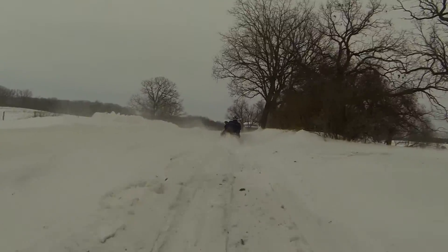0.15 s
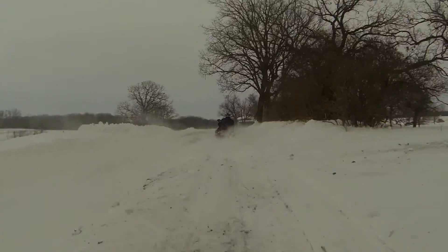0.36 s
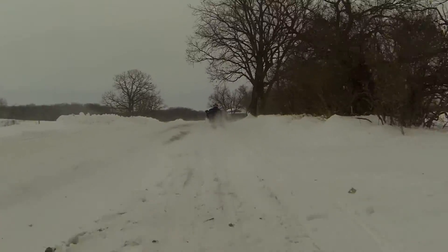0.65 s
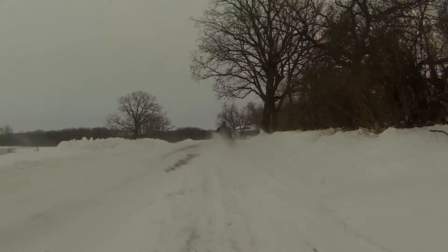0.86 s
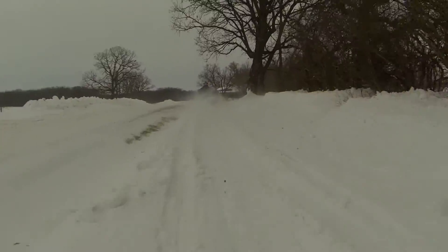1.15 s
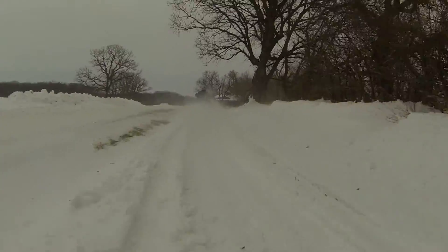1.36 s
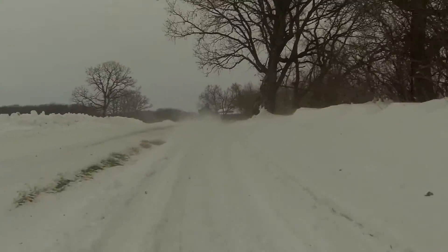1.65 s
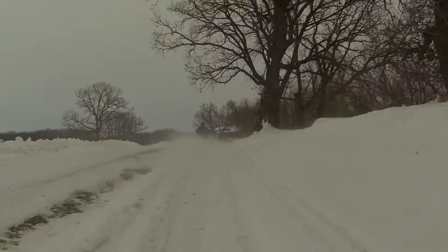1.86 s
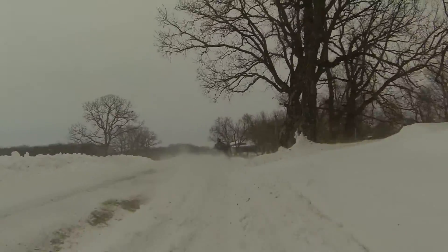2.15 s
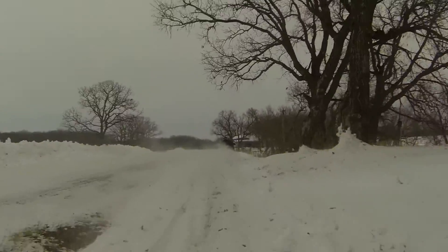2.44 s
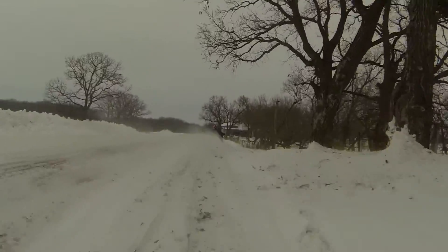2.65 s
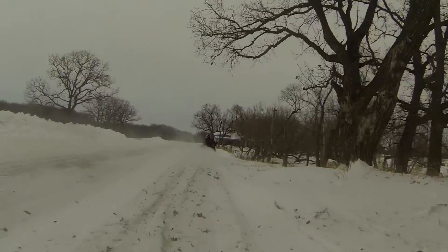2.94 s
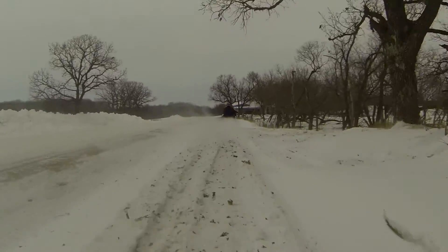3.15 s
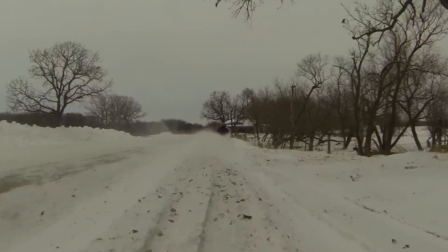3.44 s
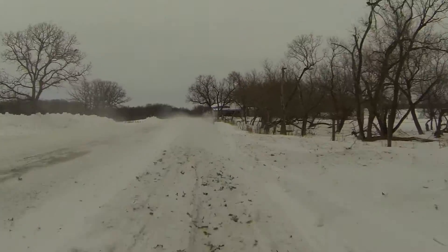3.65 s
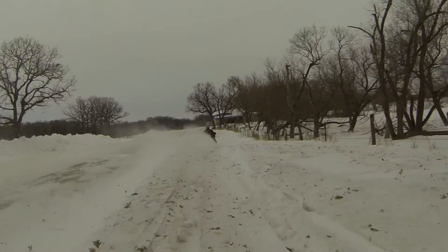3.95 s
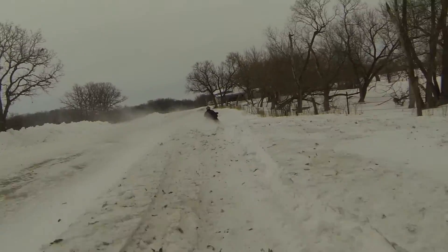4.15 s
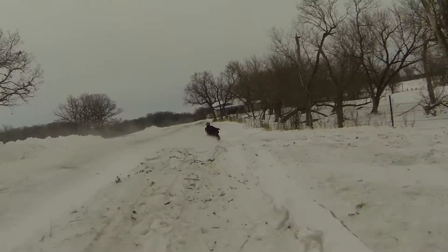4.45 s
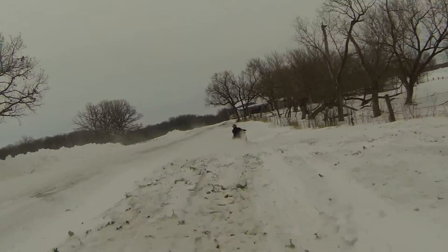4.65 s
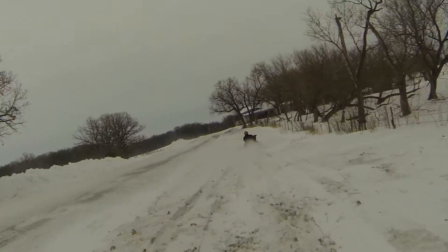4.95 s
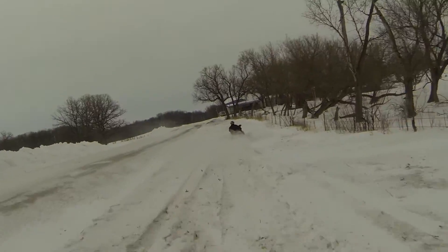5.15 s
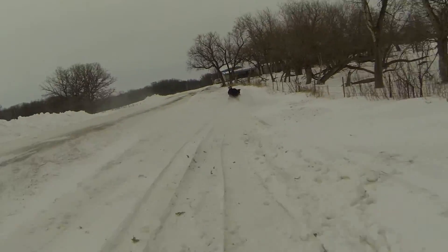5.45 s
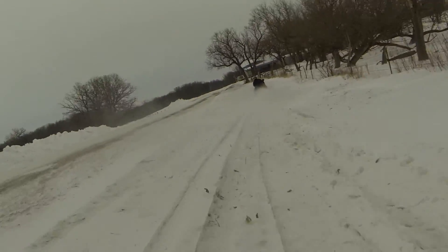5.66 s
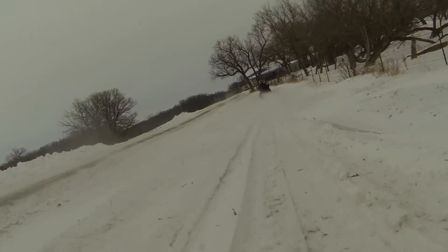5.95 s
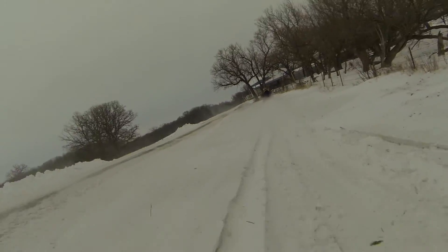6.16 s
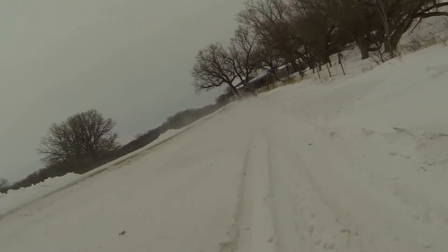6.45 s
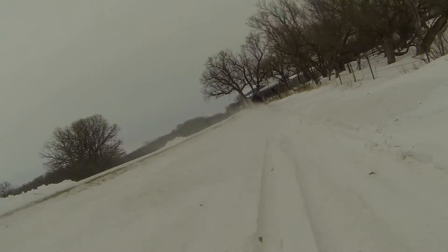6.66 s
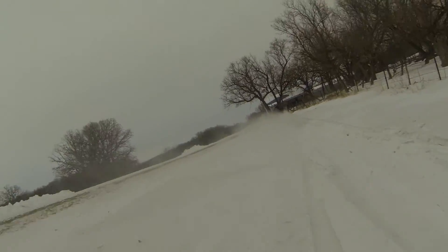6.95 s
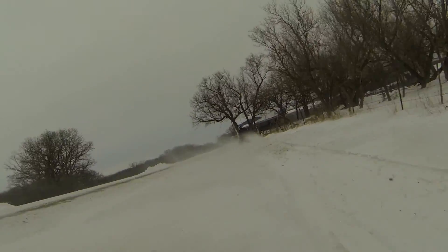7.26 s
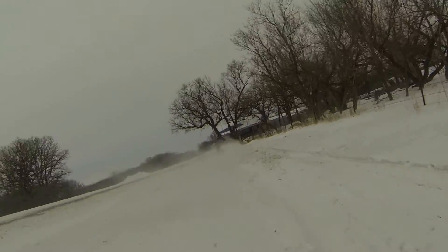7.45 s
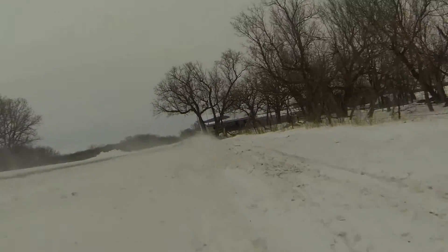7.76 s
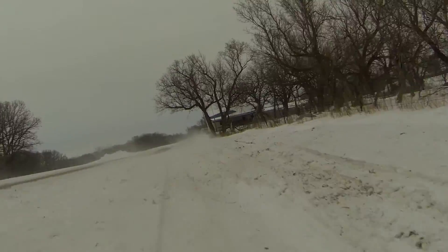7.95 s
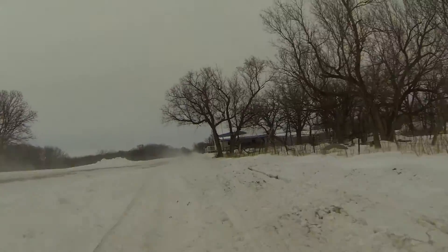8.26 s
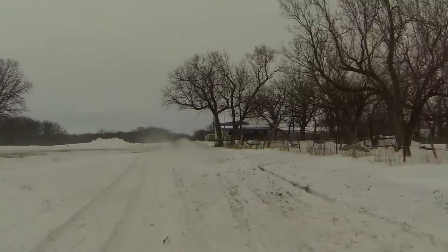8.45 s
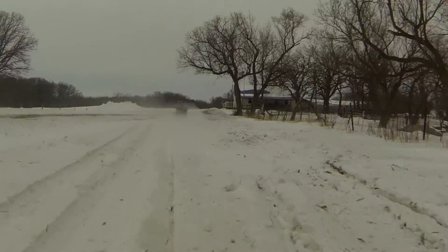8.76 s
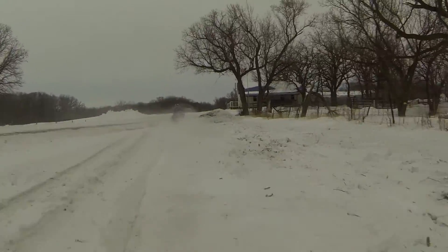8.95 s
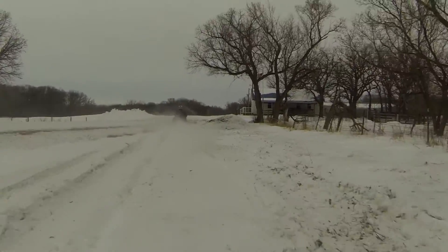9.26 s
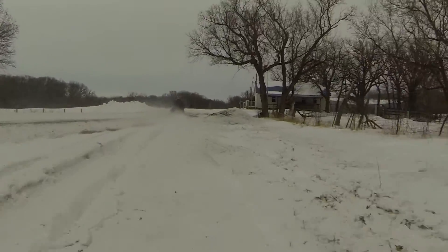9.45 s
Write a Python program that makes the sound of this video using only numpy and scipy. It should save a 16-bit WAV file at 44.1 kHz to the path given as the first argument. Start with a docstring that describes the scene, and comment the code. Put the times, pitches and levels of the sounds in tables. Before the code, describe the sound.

Heard from a microphone shut in a case on the machine, a snowmobile engine rises and falls in pitch again and again over a deep vibration and the rumble of its track. Snow hisses in surges, and sharp little plastic clicks come in spells, mostly at the start, middle and end. Late on, the engine winds up to its highest whine, then eases to a rougher, lower drone and keeps going.

```python
"""A snowmobile rides a roadside trail, heard from a closed camera case mounted on it. From the start
the mount shudders near 55 Hz and the case ticks on bumps. As the throttle opens and the track digs into
humps, engine harmonics and rasp ring in the case near 1.4 kHz, over exhaust note, track rumble and the
hiss of snow. The note clears with each climb of the revs and turns to rasp with each fall. The revs
peak near 7.7 s, then sink back, and the ride goes on with the case chattering."""
import sys
import numpy as np
from scipy import signal
from scipy.fft import rfft, irfft, next_fast_len
from scipy.io import wavfile
from scipy.ndimage import uniform_filter1d

SR = 44100
rng = np.random.default_rng(int(sys.argv[2]) if len(sys.argv) > 2 else 0)


def dump_mix(stems):
    """Bounce the given channels to the path in sys.argv[1] as a 16-bit WAV at rate SR."""
    frames = np.atleast_2d(stems).T  # one column per channel
    limited = np.clip(frames, -1, 1)  # hard clip at full scale
    pcm = np.round(limited * 32767).astype(np.int16)
    wavfile.write(sys.argv[1], SR, pcm)


N = 423801
TIME = np.arange(N) / SR
CRUISE_HZ = 100  # crankshaft turns per second at cruising revs


def snarl(turns, load, speed):
    """Resonance: high engine harmonics and gas noise, puffing with each turn, ring in the case."""
    # Response of the case. Each row: frequency in Hz, gain in dB.
    case = [(200, -43), (500, -25.5), (790, -20.5), (930, -27), (1030, -22), (1200, -11.5), (1320, -1.5),
            (1600, -2.5), (1830, -15), (2450, -13.5), (3400, -20), (4050, -32.5), (9000, -60)]
    # Narrow modes of the case. Each row: frequency in Hz, width in Hz, gain in dB.
    modes = [(1450, 40, 3), (1975, 77, 5.5), (2273, 78, 7), (2858, 60, 2), (3495, 45, 5)]
    share = clean_share(speed, steady=0.48, climbing=0.091, per_octave=0.42)
    share = np.clip(share + 0.015 * excess(speed, 127), 0, 0.85)  # cleaner still near top revs
    tone = colour(harmonics(turns, range(8, 40), flutter_db=4), case, modes)
    tone = colour(tone, [(1600, -1), (1820, -2.5), (2000, -2), (2250, -1.7), (2550, -8.5)])
    puffs = 1 + 0.062 * np.cos(2 * np.pi * turns) + 0.12 * np.cos(4 * np.pi * turns)
    rasp = colour(rng.standard_normal(N) * puffs * from_db(0.61 * drift(28)), case, modes)
    sound = blend(tone, rasp, share, band_hz=(1100, 1850))
    treble_db = level(load, speed, base_db=0.4, per_load=-0.046, per_octave=3.2)
    sound = sound + band(sound, 1870, 16000) * (from_db(treble_db) - 1)
    level_db = level(load, speed, base_db=-29, per_load=0.92, per_octave=-0.1)
    return from_db(level_db + 1.08 * drift(11)) * sound


def exhaust_and_track(turns, load, speed):
    """Structure-borne sound: the mount passes exhaust harmonics and the track's rumble on snow."""
    # Spectral envelope of the exhaust note. Each row: frequency in Hz, gain in dB.
    exhaust = [(135, -19.5), (172, -2), (212, -4.5), (240, -5), (275, -15), (320, -0.5), (400, -10.5),
               (470, -19.5), (620, -17.5), (800, -25.5), (930, -40)]
    # Spectrum of the track. Each row: frequency in Hz, spectral density in dB.
    track = [(20, -6), (42, 15.5), (90, 9), (145, -0.5), (180, 3.5), (240, 9), (280, -2.5), (350, 3.5),
             (420, -4), (480, -12.5), (800, -25), (930, -29), (5000, -80)]
    share = clean_share(speed, steady=0.44, climbing=0.26, per_octave=0.78)
    share = share * from_db(-0.5 * excess(speed, 111))  # at top revs the note sinks into the rumble
    boom = from_db(-0.6 * excess(speed, 109)) * harmonics(turns, [2], flutter_db=2.5)
    note = colour(boom + harmonics(turns, range(3, 10), flutter_db=2), exhaust)
    rumble = colour(rng.standard_normal(N) * from_db(0.91 * drift(30)), track)
    sound = blend(note, rumble, share, band_hz=(130, 480))
    level_db = level(load, speed, base_db=-33, per_load=0.92, per_octave=-8.5)
    isolation_db = 0.28 * excess(speed, 112.7)  # the mount keeps out more at high revs
    return from_db(level_db - isolation_db + 1.57 * drift(5.6)) * sound


def frame_shake(turns, load, speed):
    """Forced vibration: the engine rocks the frame once a turn; the mount passes less at high revs."""
    level_db = level(load, speed, base_db=-32, per_load=0.61, per_octave=-24)
    rocking = from_db(level_db + 0.88 * drift(1.7)) * np.sqrt(2) * np.sin(2 * np.pi * turns)
    return colour(rocking, [(100, -1), (115, -1), (132, -5)])


def mount_shudder(cycles, load, roughness):
    """Amplitude modulation: the mount's near-sinusoidal swing wavers on rough snow and briefly stalls."""
    # Dips of the swing. Each row: centre in seconds, half width in seconds.
    stalls = [(0, 0.039), (0.147, 0.078), (1.28, 0.057), (1.608, 0.027), (1.81, .035), (2.174, .012),
              (2.314, 0.032), (3.202, 0.033), (3.66, 0.035), (4.36, 0.034), (4.655, 0.034), (4.84, 0.015),
              (5.96, 0.016), (6.078, .015), (6.373, 0.02), (6.827, .045), (7.359, .016), (7.47, .014),
              (7.59, 0.0071), (7.7, 0.0079), (7.806, .02)]
    stall_db = 16.5 * sum(swell(centre, width_s) for centre, width_s in stalls)
    waver_db = 2.25 * roughness * np.abs(drift(8.9))
    level_db = -14.5 - 0.013 * load - stall_db - waver_db
    return from_db(level_db) * np.sqrt(2) * np.sin(2 * np.pi * cycles)


def case_ticks(cycles):
    """Impact noise: plastic strikes plastic, hard on bumps, lightly on most swings while it chatters."""
    # The hardest impacts. Each row: time in seconds, relative level in dB.
    knocks = [(0.1321, -19), (0.3471, -24), (0.3895, -28), (0.4983, -24), (0.6754, -30), (0.7806, -33),
              (0.9777, -27), (1.3773, -28), (1.6666, -24.5), (1.6886, -23), (2.7651, -28), (3.1038, -26),
              (4.1674, -27), (4.3505, -25), (4.3715, -25), (4.4059, -24), (4.5291, -26), (4.559, -24),
              (4.6394, -27), (5.0459, -29), (5.1672, -32), (8.4233, -29), (8.8932, -29), (8.9371, -29),
              (8.979, -29), (9.41, -31), (9.4305, -26)]
    # Spells of chatter. Each row: start in seconds, end in seconds, typical relative level in dB.
    chatter = [(0.1, 1.05, -34.5), (2.5, 2.85, -36), (4.15, 4.6, -31.5), (5.0, 5.65, -40.5),
               (6.95, 7.8, -44), (7.8, 8.2, -36), (8.35, 9.0, -36), (9.15, 9.6, -37.5)]
    # Spectrum of an impact. Each row: frequency in Hz, gain in dB.
    spectrum = [(1500, -10), (3600, -5), (4900, 1), (6300, -2.5), (8300, -11), (10300, -19), (12800, -16),
                (15000, -21)]
    chance, spread_db, gain_db, decay_s = 0.85, 3, 19.5, 0.00068
    swing_ends = TIME[1:][np.diff(np.floor(cycles)) > 0]
    count = len(swing_ends)
    impacts = list(knocks)
    for when, luck, force in zip(swing_ends, rng.random(count), rng.standard_normal(count)):
        for start, end, db in chatter:
            if start < when < end and luck < chance:
                impacts.append((when, db + spread_db * force))
    clicks = np.zeros(N)
    age = np.arange(SR // 200) / SR
    for when, db in impacts:
        crack = rng.standard_normal(len(age)) * np.exp(-age / decay_s)
        crack /= np.linalg.norm(crack)
        at = min(int((when + 0.001) * SR), N)
        clicks[at:at + len(age)] += from_db(db + gain_db) * crack[:N - at]
    return colour(clicks, spectrum)


def snow_hiss(load, speed):
    """Broadband noise: the drive and thrown snow hiss, surging with load and brightening with revs."""
    # Spectrum of the hiss. Each row: frequency in Hz, spectral density in dB.
    spectrum = [(2500, -15), (4100, -10), (4800, 3), (5700, -5.5), (7000, -8.5), (8000, -3.5),
                (9000, -16.5), (11000, -18.5), (12500, -26), (14400, -19), (15000, -43.5)]
    hiss = colour(rng.standard_normal(N), spectrum, modes=[(4430, 170, 9.2), (6380, 230, 5.1)])
    hiss = hiss / hiss.std()
    sizzle_db = level(load, speed, base_db=-0.1, per_load=0, per_octave=10)
    hiss = hiss + band(hiss, 9000, 18000) * (from_db(sizzle_db) - 1)
    inertia_s = 0.55  # the sled takes time to gather speed
    pole = np.exp(-1 / (inertia_s * SR))
    momentum_db = 0.4 * signal.lfilter([1 - pole], [1, -pole], load)
    level_db = level(load, speed, base_db=-57.5, per_load=0.57, per_octave=0.93)
    return from_db(level_db + momentum_db + 1.9 * drift(11)) * hiss


def engine_load():
    """Superposition: throttle squeezes and humps of snow add up to the load, in dB above coasting."""
    # Squeezes of the throttle. Each row: opening in seconds, closing in seconds, load in dB.
    throttle = [(-.1, 0.183, 0), (0.43, 1.023, 5), (1.382, 2.116, 8.5), (2.07, 2.798, 5),
                (2.81, 3.344, 8.5), (3.303, 4.02, 11), (4.063, 5.18, 4.5), (5.633, 6.55, 8),
                (6.65, 7.102, 6.5), (7.274, 7.957, 9), (8.244, 9.6, 3.5)]
    # Humps the track digs into. Each row: peak time in seconds, extra load in dB, rise in seconds.
    humps = [(0.171, 7, 0.24), (0.409, 2, 0.089), (.74, 4, 0.042), (1.345, 7.5, 0.096), (1.92, 5.5, 0.26),
             (2.372, 7, 0.13), (2.74, 0.5, 0.022), (3.08, 5, 0.034), (3.68, 3.5, 0.09), (4.21, 0.5, 0.044),
             (4.4, 3.5, 0.05), (4.702, 6, 0.033), (5.01, 6.5, 0.076), (6.021, 3.5, 0.071),
             (6.479, 6, 0.094), (6.919, 7, 0.071), (7.9, 0.6, 0.034), (9.08, 3, 0.11), (9.27, 5, 0.029),
             (9.44, 4.5, .035), (9.58, 7, 0.023)]
    open_s, close_s, lull_db, lull_s = 0.19, 0.042, 2.5, 0.049
    load = sum(db * swell(peak, rise_s, fall_ratio=0.45) for peak, db, rise_s in humps)
    next_openings = [row[0] for row in throttle[1:]] + [np.inf]
    for (opens, closes, db), reopens in zip(throttle, next_openings):
        rise = np.clip((TIME - opens) / open_s, 0, 1)
        fall = np.clip(1 - (TIME - closes) / close_s, 0, 1)
        load = load + db * rise * fall
        if reopens > closes + close_s:  # shut fully, the engine goes slack for a moment
            load = load - lull_db * swell(closes + close_s + lull_s, lull_s)
    return load


def harmonics(turns, orders, flutter_db):
    """Fourier series: periodic firing gives partials at multiples of the crank rate, each fluttering."""
    # Partials that stand out or fall back. Each row: multiple of the crank rate, gain in dB.
    emphasis = [(2, 3), (3, 2.5), (4, 2), (5, -6.5), (6, 2), (7, -4), (8, -1), (9, -2), (10, -5), (11, 2),
                (12, 2.5), (13, -0.5), (14, 0), (15, 3.5), (16, 1), (21, 3), (22, 4)]
    order_db = dict(emphasis)
    tone = 0
    for order in orders:
        gain = from_db(order_db.get(order, 0) + flutter_db * drift(7))
        tone = tone + gain * np.sin(2 * np.pi * (order * turns + rng.random()))
    return tone


def clean_share(speed, steady, climbing, per_octave):
    """Periodicity: even firing at high or climbing revs puts a larger share of power in the harmonics."""
    octaves = np.log2(speed / CRUISE_HZ)
    octaves_per_s = uniform_filter1d(np.gradient(octaves) * SR, SR // 8)
    pull = np.tanh(octaves_per_s / 0.28)
    return np.clip(steady + climbing * pull + per_octave * octaves, 0.05, 0.82)


def mount_cycles(roughness):
    """Phase modulation: rough ground jolts the phase of the mount's swing, counted in cycles."""
    # Rate of the swing. Each row: time in seconds, frequency in Hz.
    swing_rate = [(0, 55.9), (1, 55), (2.5, 57), (3.1, 53.57), (3.8, 55.86), (4.2, 53.95), (4.6, 57.2),
                  (5.1, 57.9), (6.6, 52.63), (7.05, 52.7), (7.45, 57.6), (7.85, 58.9), (8.25, 53.9),
                  (9.6, 56.6)]
    return np.cumsum(in_time(swing_rate)) / SR + 0.055 * roughness * drift(9)


def level(load, speed, base_db, per_load, per_octave):
    """Power law: a level in dB moves in proportion to dB of load and octaves of revs above cruising."""
    return base_db + per_load * load + per_octave * np.log2(speed / CRUISE_HZ)


def blend(tone, noise, share, band_hz):
    """Incoherent addition: tone and noise, each levelled within a band, share the power."""
    return np.sqrt(share) * levelled(tone, band_hz) + np.sqrt(1 - share) * levelled(noise, band_hz)


def levelled(x, band_hz):
    """Normalisation: x held at unit rms within a band, over tenths of a second."""
    power = uniform_filter1d(band(x, *band_hz) ** 2, SR // 10)
    return x / np.sqrt(power + 1e-12)


def colour(x, spectrum, modes=()):
    """Linear filtering by a curve of (Hz, dB) points and resonances of (Hz, width in Hz, dB)."""
    size = next_fast_len(N + SR // 10)
    hz = np.fft.rfftfreq(size, 1 / SR)
    point_hz, point_db = np.transpose(spectrum)
    curve_db = np.interp(np.log(hz + 1), np.log(point_hz), point_db)
    modes_db = sum(db / (1 + (2 * (hz - centre) / width) ** 2) for centre, width, db in modes)
    return irfft(rfft(x, size) * from_db(curve_db + modes_db), size)[:N]


def band(x, low_hz, high_hz):
    """Zero-phase band-pass filtering."""
    return signal.sosfiltfilt(signal.butter(3, [low_hz, high_hz], "band", fs=SR, output="sos"), x)


def drift(rate_hz):
    """Low-passed noise: a smooth random fluctuation of unit standard deviation."""
    hop, settle = 40, 2000
    pole = np.exp(-2 * np.pi * rate_hz * hop / SR)
    noise = rng.standard_normal(N // hop + settle + 2)
    slow = signal.lfilter([1], [1, -2 * pole, pole * pole], noise)[settle:]
    return np.interp(np.arange(N) / hop, np.arange(len(slow)), slow / slow.std())


def swell(peak_s, rise_s, fall_ratio=1):
    """A Gaussian pulse of height 1 whose fall lasts fall_ratio times its rise."""
    width = np.where(TIME < peak_s, rise_s, rise_s * fall_ratio)
    return np.exp(-0.5 * np.minimum(((TIME - peak_s) / width) ** 2, 50))


def excess(speed, threshold_hz):
    """A threshold: the crank rate above it in Hz, zero below."""
    return np.maximum(speed - threshold_hz, 0)


def in_time(curve):
    """Linear interpolation of (seconds, value) points at every sample."""
    return np.interp(TIME, *np.transpose(curve))


def from_db(db):
    """Decibels to amplitude ratio."""
    return 10 ** (np.asarray(db) / 20)


def scene():
    """Common modulation: one slightly uneven crankshaft and one load tie the sources together."""
    # Revs of the crankshaft. Each row: time in seconds, turns per second.
    crank = [(0, 79.3), (.36, 74), (.52, 74.2), (.76, 88), (1.42, 82.3), (1.8, 100.1), (1.96, 105.5),
             (2.18, 116), (2.36, 101.5), (2.86, 92.8), (3.18, 106.8), (3.32, 98.3), (3.5, 97.8),
             (3.78, 109), (3.92, 100.5), (4.2, 88.4), (4.52, 82.1), (4.88, 81.2), (5.17, 96.2),
             (5.32, 89.6), (5.66, 87.5), (6.08, 105.4), (6.51, 116.8), (6.68, 106.5), (6.79, 104.3),
             (6.96, 111), (7.33, 130.4), (7.5, 133.3), (7.74, 134.4), (7.99, 111.8), (8.22, 97.6),
             (9.02, 87.6), (9.4, 99.5), (9.6, 95.3)]
    speed = in_time(crank)
    load = engine_load()
    roughness = from_db(level(load, speed, base_db=-5.5, per_load=1, per_octave=-5.5))
    turns = np.cumsum(speed * (1 + 0.00322 * drift(23.5))) / SR
    cycles = mount_cycles(roughness)
    mix = snarl(turns, load, speed) + exhaust_and_track(turns, load, speed)
    mix += frame_shake(turns, load, speed) + mount_shudder(cycles, load, roughness)
    mix += snow_hiss(load, speed) + case_ticks(cycles)
    return mix[None]


def record(dry):
    """Band limiting: a steep low-pass filter cuts the highest treble."""
    cutoff_hz = 15300
    return signal.sosfilt(signal.ellip(10, 0.1, 80, cutoff_hz, fs=SR, output="sos"), dry)


dry = scene()
out = record(dry)
dump_mix(out)
```